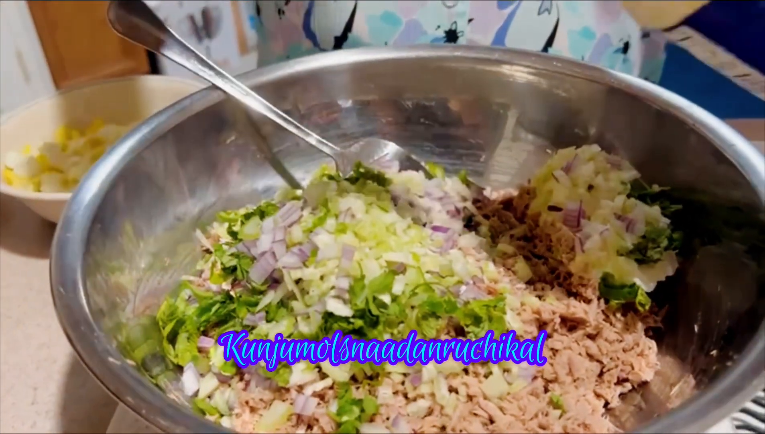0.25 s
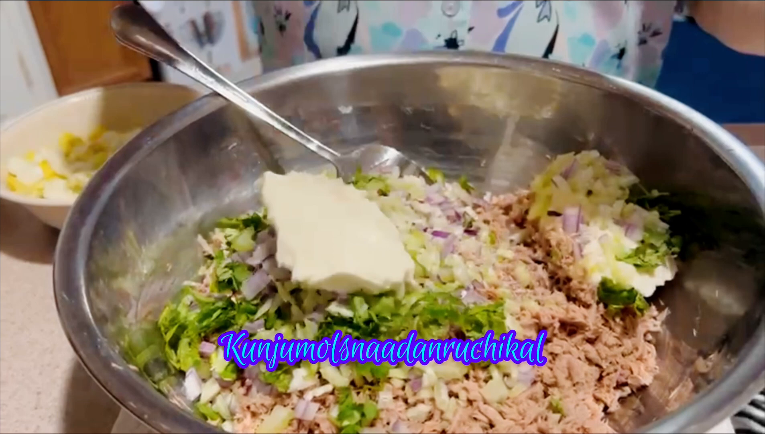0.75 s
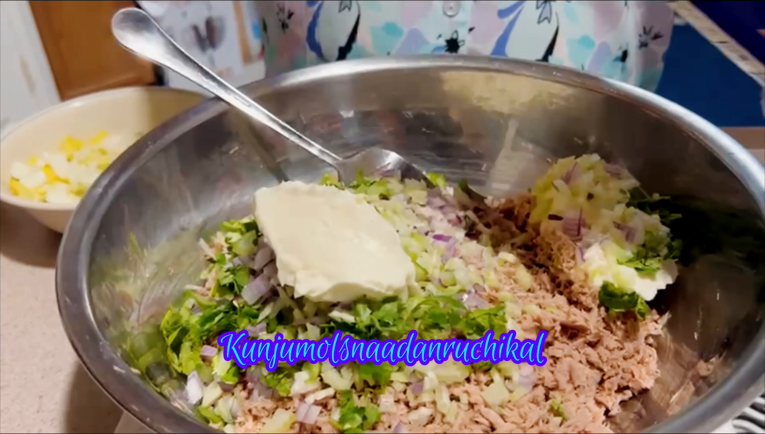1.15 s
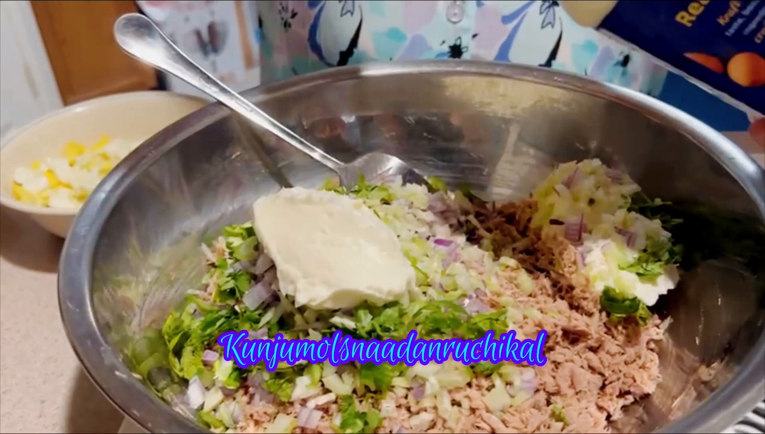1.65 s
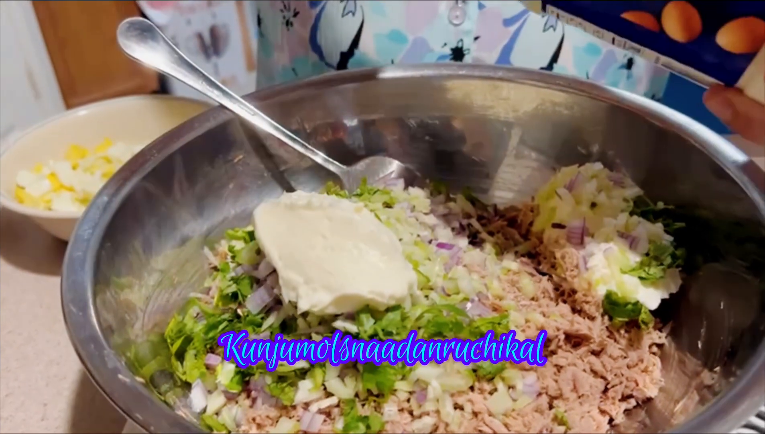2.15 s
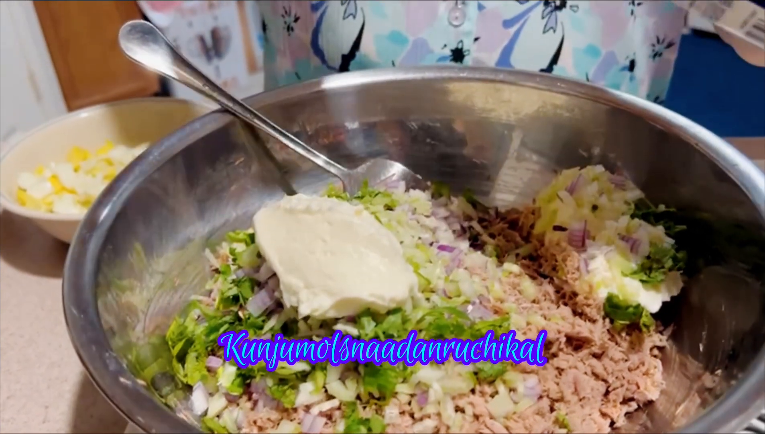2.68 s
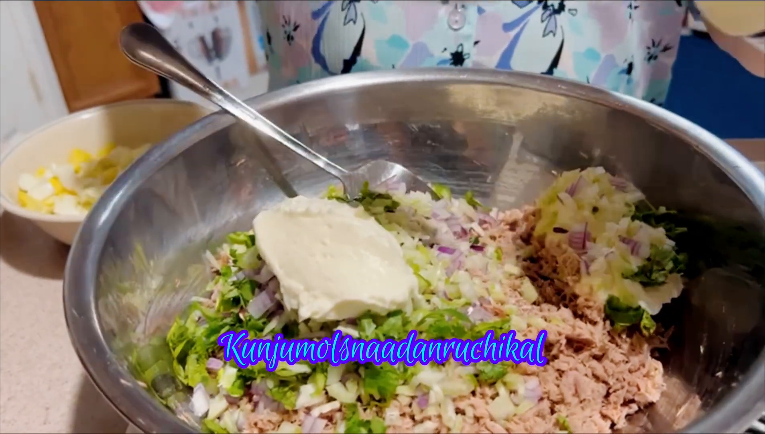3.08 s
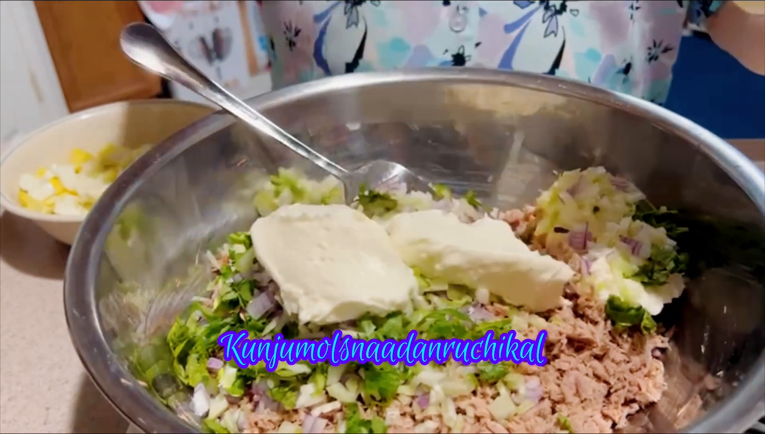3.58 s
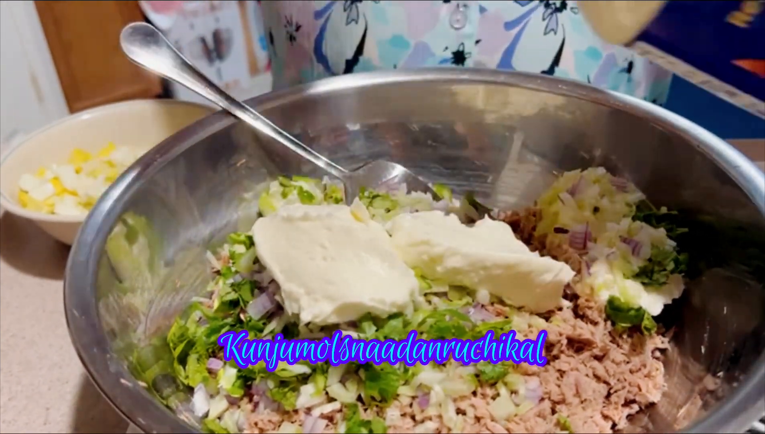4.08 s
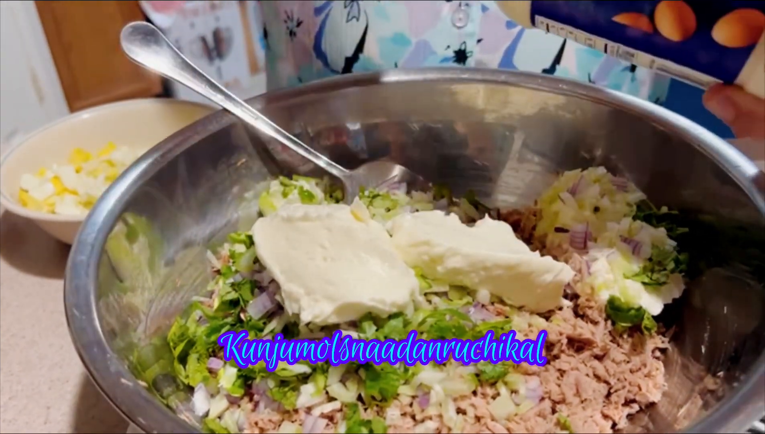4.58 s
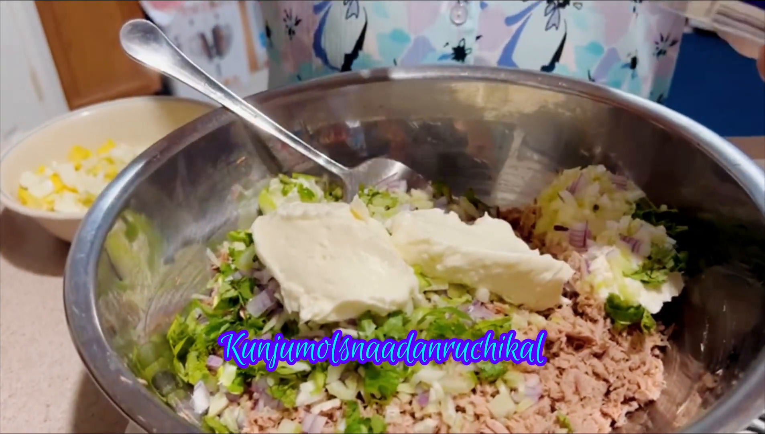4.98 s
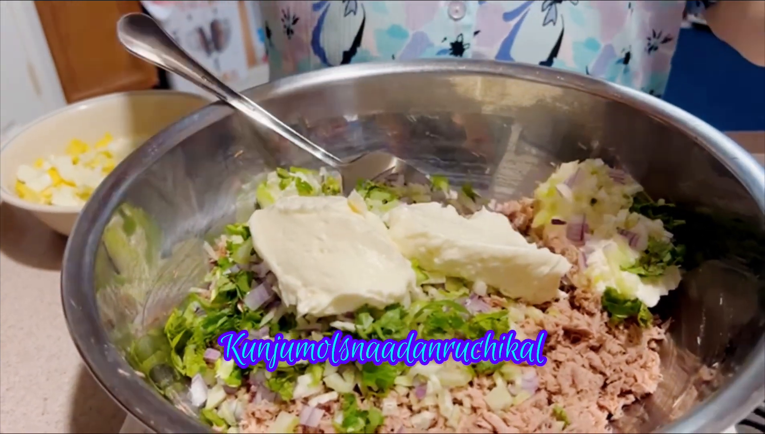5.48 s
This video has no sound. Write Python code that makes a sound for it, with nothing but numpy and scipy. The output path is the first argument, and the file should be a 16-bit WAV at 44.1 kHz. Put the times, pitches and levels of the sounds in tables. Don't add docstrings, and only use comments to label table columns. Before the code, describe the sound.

Quiet kitchen with a low refrigerator hum and rumble. A faint steel touch and a few tiny wet ticks, then two hard hollow plastic knocks just after one second, lighter knocks and a soft sticky scrape near two. After a pause come small ticks, a knock around four, then a busy scraping flurry and a deeper late knock. Close phone stereo; the jar sits to the right.

```python
import sys
import numpy as np
from scipy import signal
from scipy.fft import rfft, irfft, next_fast_len
from scipy.io import wavfile
from scipy.ndimage import uniform_filter1d, map_coordinates

SR = 44100
rng = np.random.default_rng(int(sys.argv[2]) if len(sys.argv) > 2 else 0)


def transcribe(u):
    v = np.clip(np.atleast_2d(u).T, -1, 1)
    q = np.round(v * 32767).astype(np.int16)
    wavfile.write(sys.argv[1], SR, q)


def invert_db(x):
    u = np.asarray(x, float) / 20
    return 10 ** u


N = 253114

# (time [s], crack level [dB], bright level [dB], air space [Hz], air ring level [dB])
KNOCKS = [(1.2268, -23, 4, 562, -31), (1.354, -27.5, 5.5, 571, -44.5), (1.5094, -68, -22, 574, -60),
          (1.8716, -34.5, 7, 607, -51.5), (2.1081, -54, 7, 575, -67), (2.1462, -50, -4, 568, -71),
          (2.2436, -41, -5.5, 540, -61), (2.308, -53, -26.5, 547, -64), (4.058, -37, -5, 526, -47.5),
          (4.6055, -56.5, -10, 494, -55.5), (4.6326, -50, -2, 530, -66), (4.6703, -45.5, -18, 677, -58),
          (4.704, -41.5, -17, 540, -53.5), (5.1044, -31.5, 3.5, 286, -46), (5.2906, -38, 7, 425.5, -54)]
# (time [s], thud level [dB], thud pitch [Hz], wall ring level [dB], wall ring pitch [Hz])
BODY = [(1.2268, -44.5, 289.5, -21, 1100), (1.23, -55, 380, -42, 1400), (1.354, -36, 398.3, -35, 1020),
        (1.87, -44.5, 330, -49, 870), (2.068, -46.5, 234.7, -69, 1046), (2.147, -43.5, 479, -54, 870),
        (2.243, -36.5, 437.5, -39, 900), (2.252, -43.5, 382.6, -47, 811), (4.058, -38, 342, -37.5, 1063),
        (4.606, -48, 242, -40.5, 1570), (4.629, -50, 321, -43.5, 1580), (4.671, -38, 374, -62.5, 854),
        (4.706, -39.5, 240, -45, 850), (4.766, -70, 243.8, -43, 1490), (5.105, -34.5, 327, -36.5, 1536),
        (5.292, -37, 408, -42, 965)]
# (time [s], t60 [s])
GRIP = [(1.23, 0.039), (1.51, 0.067), (1.87, 0.041), (2.3, 0.064), (4.06, 0.017), (4.7, 0.028),
        (5.3, 0.053)]
# (centre [Hz], width [Hz], level [dB])
JAR_WALL = [(720, 250, -2), (1090, 190, -6.5), (1360, 160, 0.5), (2100, 510, -4.5), (3240, 2000, -11.5)]
# (time [s], level [dB], centre [Hz])
THUMPS = [
    (1.229, -31, 758),
    (1.3542, -41.5, 800),
    (4.059, -40.5, 1350),
    (4.608, -47, 600),
    (4.673, -40.5, 630),
    (4.708, -52, 650),
    (5.106, -42, 290),
    (5.525, -50.5, 600),
]
# (time [s], level [dB], pitch [Hz])
COUNTER = [
    (1.227, -37.5, 105),
    (1.357, -53.5, 110),
    (5.106, -62, 122),
]
# (time [s], pitch [Hz], level [dB])
TILT = [
    (4.7, 560.5, -83),
    (4.762, 530.6, -71),
    (4.88, 482.7, -55),
    (4.98, 438, -58),
    (5.08, 386, -69),
]
# (start [s], lift [s], full level [dB])
DRAGS = [
    (2.08, 2.338, -70),
    (4.733, 5.11, -62),
]
# (centre [Hz], width [Hz], level [dB])
DRAGGED_JAR = [(479, 91, 2), (940, 42, -3.5), (1370, 47, 2), (2000, 420, -16.5), (2400, 250, -16),
               (3260, 190, -15), (3920, 470, -27), (4360, 190, -22), (5700, 780, -32)]
# (time [s], level [dB], centre [Hz])
STICK_SLIPS = [(2.109, -56, 600), (2.148, -46, 580), (2.16, -54, 900), (2.206, -60.5, 690), (2.247, -42.5, 560),
               (2.254, -47, 603), (2.265, -58, 800), (2.313, -56, 557),
               (4.82, -58, 493), (4.904, -48.5, 477), (4.917, -51, 525), (5.008, -59, 526), (5.031, -50.5, 1370),
         (5.05, -58.5, 930), (5.07, -57, 1380)]
# (time [s], level [dB], centre [Hz])
TAPS = [(.4535, -54, 2400), (.4555, -52.5, 1000), (.6065, -57, 1480), (1.4321, -53, 2000),
        (1.5912, -54, 2080), (1.6815, -77, 1030), (2.0181, -57, 1330), (2.0706, -39.5, 1090),
        (2.0854, -51, 1370), (2.1214, -49, 1410), (2.16, -69, 1500), (2.172, -60, 1290),
        (2.2337, -51, 1010), (2.2605, -60, 1370), (2.3736, -68, 1030), (2.4886, -62, 1490),
        (2.534, -65.5, 1820), (3.2528, -45.5, 1440), (3.285, -59.5, 1280), (3.383, -53, 1360),
        (3.6805, -52, 1510), (3.6893, -51, 1360), (4.373, -55, 1650), (4.4099, -68, 1620),
        (4.464, -56.5, 1340), (4.6221, -46, 1460), (4.6932, -48, 905), (4.7651, -45, 1360),
        (4.8464, -57, 1380), (4.961, -78, 990)]
# (time [s], level [dB], centre [Hz])
SNAPS = [(0.244, -82, 4700), (0.472, -56, 5700), (0.6068, -63, 7800), (1.43, -51.5, 7100),
         (1.5917, -60.5, 4530), (1.681, -59, 6900), (2.018, -52, 9200), (2.0702, -46.5, 7900),
         (2.122, -57, 9000), (2.159, -50, 8100), (2.172, -63, 7540), (2.194, -65, 5270), (2.26, -61, 8200),
         (2.375, -56.5, 5570), (2.437, -69, 7960), (3.252, -49.5, 9550), (3.285, -73, 8100),
         (5.5235, -72.5, 6450), (3.3832, -66.5, 5970), (3.68, -61.5, 6500), (4.311, -67, 7750),
         (4.357, -63.5, 9040), (4.3715, -57.5, 10000), (4.395, -67, 9300), (4.429, -67, 7600),
         (4.466, -49, 7800), (4.846, -64, 5680), (4.87, -56, 7140), (4.961, -68, 6640), (5.204, -61, 4430)]
# (time [s], level [dB],
# centre [Hz])
CRACKLES = [(.2432, -69, 8100), (0.4537, -51, 3400), (.459, -55, 2600), (.588, -60, 2000),
            (.597, -68, 7500), (1.395, -53, 8000), (1.465, -68, 6000), (1.477, -63, 5000),
            (1.487, -56, 2290), (1.5735, -71, 8000), (1.639, -59.5, 2400), (1.651, -60, 3700),
            (1.683, -71, 2620), (2.0715, -40.5, 4730), (2.086, -52, 5300), (2.1015, -55, 1900),
            (2.1067, -50, 8300), (2.142, -57, 8000), (2.21, -62, 2800), (2.2295, -70, 7600),
            (2.2437, -49.5, 7700), (2.3177, -54, 2500), (2.339, -63, 2400), (2.538, -71.5, 8000),
            (3.27, -72, 8500), (3.315, -68, 7500), (3.3843, -60, 2900), (3.6895, -60, 8500),
            (4.411, -55.5, 1850), (4.46, -64, 8200), (4.606, -52, 8500), (4.6714, -48, 8350),
            (4.695, -57, 8300), (4.7945, -63, 2200), (4.809, -64, 3300), (4.885, -56, 1900),
            (4.949, -67, 2300), (5.0045, -65, 6500), (5.049, -68, 2100), (5.062, -55, 1700),
            (5.165, -72, 7500), (5.24, -58, 5500), (5.251, -63, 1700), (5.259, -70, 6700),
            (5.336, -62, 5500), (5.345, -62, 4500), (5.524, -70.5, 7500), (1.2267, -24, 3300),
            (1.2265, -26, 6200), (2.0635, -64, 2500), (2.0665, -55, 8300), (2.112, -62, 4500),
            (2.12, -62, 3500), (2.127, -64, 5500), (2.173, -62, 5500), (4.0565, -49, 5000),
            (4.768, -48, 1500), (2.375, -65, 4500), (1.5915, -54, 2300)]
# (time [s], level [dB], centre [Hz], t60 [s])
LINGERS = [(1.238, -53, 2160, .2), (1.24, -50, 1090, .2), (1.24, -63, 2830, .25), (1.24, -62, 4400, .25),
           (1.365, -58, 2000, 0.49), (1.365, -66, 2650, .3), (1.46, -67, 6100, .15),
           (1.635, -68.5, 3900, 0.12), (2.255, -71, 2400, .15), (3.552, -69, 8400, 0.12),
           (3.552, -71, 6300, .15), (4.065, -62.5, 2450, 0.14), (4.64, -61, 1400, 0.076),
           (5.217, -65, 6500, .1), (5.111, -45.5, 257, 0.22), (5.04, -78, 4200, 0.35), (4.8, -77, 3300, .3),
           (5.4, -83.5, 2500, 0.46), (1.356, -52, 610, 0.12), (1.4, -52, 720, 0.099),
           (1.5, -58, 1900, 0.07), (4.064, -74, 8240, 0.073)]
# (middle [s], length [s], rms level [dB], centre
# [Hz])
SMEARS = [(0.465, 0.03, -62.5, 2470), (0.485, 0.026, -67, 4600), (0.608, 0.038, -74, 4300),
          (1.476, 0.13, -73.5, 3750), (1.645, 0.028, -67.5, 3370), (1.964, 0.039, -68, 5850),
          (2.32, 0.013, -69.5, 7600), (3.272, 0.066, -76.5, 7100), (3.424, 0.05, -81, 5900),
          (3.563, 0.023, -71, 7040), (3.688, 0.015, -70, 5630), (4.071, 0.026, -80.5, 2575),
          (4.47, 0.044, -76, 8160), (4.885, 0.032, -71, 7460), (5.343, 0.013, -64.5, 3720),
          (1.297, 0.064, -68, 4500), (5.162, .04, -72.5, 5940), (5.244, 0.03, -73.5, 5940)]
# (middle [s], length [s], rms level [dB], centre [Hz])
SHOVES = [(2.12, 0.049, -63.5, 880), (2.16, 0.0047, -54, 1080), (2.315, 0.038, -63, 694),
          (5.245, 0.021, -54.5, 1383), (5.533, 0.013, -59.5, 549), (3.41, 0.083, -72, 1240),
          (5.14, 0.11, -64.5, 930)]
# (middle [s], length [s], rms level [dB], centre [Hz])
FLEXES = [(1.235, 0.012, -45, 1280), (1.233, 0.01, -36, 730), (1.236, 0.014, -41.5, 158),
          (1.511, 0.02, -55, 353), (1.873, 0.0047, -50.5, 2050), (2.162, 0.006, -74, 1160),
          (2.173, 0.0056, -54, 1470), (4.072, .025, -63.5, 2400), (5.114, 0.015, -42, 295),
          (2.288, 0.055, -69, 1340), (2.488, 0.0091, -63, 1660), (2.536, 0.009, -67.5, 1770),
          (2.146, 0.0054, -55, 1450), (4.062, 0.0083, -40, 401), (5.052, 0.018, -58, 930),
          (5.572, 0.027, -66.5, 297)]
# (time [s], level [dB])
CHINKS = [(1.227, -44.5), (1.354, -47.5), (1.4301, -78), (1.8723, -53), (2.0173, -77), (2.071, -61),
          (2.3243, -62), (3.2525, -70), (4.3711, -61.5), (4.3926, -68), (4.6049, -61.5), (4.6309, -80),
          (4.6713, -66), (4.7044, -82), (5.1053, -60), (5.2903, -79)]
# (time [s], level [dB])
CLINK = (0.077, -58.5)
# (pitch [Hz], level [dB], t60 [s])
STEEL = [(2050, -10, 0.13), (2490, -18, 0.12), (5750, -13, 0.06), (3150, 0, 0.11), (3900, -1, 0.032),
         (7100, -14, 0.053), (6450, -16, 0.05), (8100, -15, 0.067)]
# (time [s], rustle level [dB])
HANDS = [(0., -70.5), (.3, -94), (.7, -94), (1.15, -74.5), (1.66, -66), (1.85, -87), (2.24, -64),
         (2.51, -76), (2.62, -91.5), (3.22, -94), (3.43, -69.5), (3.92, -89), (4.58, -75.5), (4.63, -60),
         (4.8, -82), (5.11, -67), (5.34, -62.5), (5.37, -71), (5.51, -93.5)]
# (frequency [Hz], level [dB])
RUSTLE = [(200, -20.5), (500, 4), (1200, -4), (2500, -5), (2850, -15), (6000, -31), (12000, -44)]
# (start [s], peak level [dB], t60 [s])
FIZZES = [(0., -87, 0.78), (1.26, -83.5, 0.9), (1.44, -84, 0.96), (1.88, -75.5, 0.93), (2.06, -65, 0.52),
          (2.26, -87, 1.9), (3.281, -93.5, 1), (4.3, -89, 2.8), (4.64, -81.5, 0.96), (5.17, -74, 0.21),
          (5.481, -98, 0.71)]
# (frequency [Hz], level [dB])
FIZZ_COLOUR = [(2000, -25), (4500, 1.5), (6500, 9), (9000, 2), (12000, -1.5)]
# (frequency [Hz], lag [rad])
LAG = [(200, .1), (340, .7), (600, .45), (800, .6), (1200, 1.4), (1900, 1.8), (3600, .4), (8000, .7),
       (9200, .3), (11400, 2.2), (11800, .5)]
# (frequency [Hz], level [dB])
SHADOW = [(300, -0.2), (700, -1.5), (1100, -5), (1800, -4), (3000, -12), (6500, -5), (7600, -1.5),
          (8800, -2.5)]
# (frequency [Hz], t60 [s])
KITCHEN = [(300, 0.53), (1500, 0.38), (5000, 0.32), (11000, 0.26)]
# (pitch [Hz], level [dB], width [Hz], steady share [0-1])
HUM = [(117.4, -52.5, 14, .74), (201.3, -57, 18, .33), (234, -68, 8, .3), (312, -75, 12, .3),
       (528, -77, 6, .6)]
# (frequency [Hz], level [dB per Hz])
FLOOR = [(15, -43.5), (33, -10.5), (42, -0.5), (52, 2), (85, -1), (105, -9.5), (150, -1), (210, -7.5),
         (270, -14), (550, -21), (1150, -31), (2500, -44), (3300, -50.5), (7200, -56.5), (12000, -59.5)]
# (frequency [Hz], likeness [0-1])
ALIKE = [(40, 0.74), (120, 0.91), (200, 1), (350, 0.83), (630, 0.38), (1200, 0.081), (3000, 0.56),
         (12000, 0.28)]
# (middle [s], length [s], rms level [dB], centre [Hz])
STREET = [
    (1.1, 0.6, -74.5, 1830),
    (3.545, 0.26, -76, 1900),
    (4.198, .4, -83, 2007),
    (5.6, 0.45, -87, 1800),
]
# (frequency [Hz], level [dB])
MIC = [(9000, 0), (10300, -3), (11500, 5.5), (12000, -15), (12600, -41)]
# (frequency [Hz], level [dB])
SHARED = [(9500, 0.5), (9750, -4), (10900, -11), (11250, -2.5)]
# (frequency [Hz], level [dB])
APART = [(1500, -0.5), (3000, -1), (7800, 3), (8500, 1.5), (8750, -8), (9300, -9), (9600, 3.5),
         (10600, 6.5), (11200, -0.5), (11600, -9.5)]


def unit(x):
    return x / np.sqrt(np.mean(x ** 2) + 1e-20)


def peak(x):
    return x / np.abs(x).max()


def along(points, hz):
    f, v = np.transpose(points)
    return np.interp(np.log(hz + 1), np.log(f + 1), v)


def filtered(x, response):
    n = x.shape[-1]
    m = next_fast_len(n + 4096)
    return irfft(rfft(x, m) * response(np.fft.rfftfreq(m, 1 / SR)), m)[..., :n]


def resonances(peaks):
    def response(f):
        total = 0
        for k, (centre, width, db) in enumerate(peaks):
            damping = 1j * f * width
            total = total + (-1) ** k * invert_db(db) * damping / (centre ** 2 - f ** 2 + damping)
        return total
    return response


def band(x, hz, width):
    one = resonances([(hz, width, 0)])
    return filtered(x, lambda f: one(f) ** 2)


def wobble(rate):
    knots = rng.standard_normal(int(N * rate / SR) + 4)
    return map_coordinates(knots, [np.arange(N) * rate / SR])


def grains(fast_db, slow_db):
    lumps = invert_db(fast_db * wobble(400) + slow_db * wobble(60))
    return lumps * rng.standard_normal(N)


def patches(shape, frames):
    field = uniform_filter1d(rng.standard_normal(shape), size=3, axis=0)
    return unit(uniform_filter1d(field, size=frames, axis=1))


def burst(t, t60, rise, contact):
    noise = rng.standard_normal(len(t)) * invert_db(-60 * t / t60) * (1 - np.exp(-t / rise))
    return noise - contact * (np.arange(len(t)) == 8)


def add(track, s, sound):
    track[round(s * SR):][:len(sound)] += sound


def knocks():
    out, t = np.zeros((2, N + SR)), np.arange(SR // 4) / SR
    jar, click = resonances(JAR_WALL), resonances([(5600, 5900, 1.7)])
    for s, db, bright_db, air_hz, air_db in KNOCKS:
        t60 = np.interp(s, *np.transpose(GRIP))
        blow = np.array([burst(t, 0.026, 0.00044, contact=1.5), 6.2 * (t == 0)])
        wall = filtered(blow, lambda f: jar(f) / (1 + 1j * f / 8000) ** 2)
        sharp = np.array([burst(t, 0.011, 0.0002, contact=7), 2.8 * (t == 0)])
        bright = filtered(sharp, lambda f: click(f) ** 2 / (1 + 1j * f / 9000) ** 3)
        crack = wall / np.abs(wall[0]).max() + invert_db(bright_db - 0.5) * bright / np.abs(bright[0]).max()

        waver = map_coordinates(rng.standard_normal(20), [2 + 55 * t])
        held = invert_db(-60 * (t / t60) ** 2.5)
        after_ring = invert_db(-27.5 - 60 * t / 0.25) * waver
        swell = (1 - np.exp(-t / 0.005)) * (held + after_ring)
        air = peak(swell * np.sin(2 * np.pi * air_hz * t + 0.5 * waver))
        air = air * invert_db([[0], [-9]])
        add(out.T, s, (invert_db(db + 2.5) * crack + invert_db(air_db + 10) * air).T)
    return out[:, :N]


def body():
    out, t = np.zeros(N + SR), np.arange(SR // 8) / SR
    for s, thud_db, thud_hz, ring_db, ring_hz in BODY:
        t60 = min(0.93 * np.interp(s, *np.transpose(GRIP)), 0.03)
        thud = peak(invert_db(-60 * t / 0.026) * np.sin(2 * np.pi * thud_hz * t))
        ring_level = invert_db(-60 * t / t60) * (1 - np.exp(-t / 0.00047))
        ring = peak(ring_level * np.sin(2 * np.pi * ring_hz * t))
        add(out, s, invert_db(thud_db - 0.5) * thud + invert_db(ring_db - 1) * ring)
    return out[:N]


def counter():
    out, t = np.zeros(N + SR), np.arange(SR // 4) / SR
    for s, db, hz in COUNTER:
        add(out, s, invert_db(db - 60 * t / 0.16) * np.sin(2 * np.pi * hz * t))
    return out[:N]


def tilt():
    s, hz, db = np.transpose(TILT)
    t = np.arange(N) / SR
    turns = np.cumsum(np.interp(t, s, hz)) / SR
    level = invert_db(np.interp(t, s, db, left=-130, right=-130))
    return level * unit(0.92 + wobble(70)) * np.sin(2 * np.pi * turns)


def drag():
    t = np.arange(N) / SR
    level = 0
    for s, lift, db in DRAGS:
        times = [s, s + 0.59 * (lift - s), lift, lift + 0.054]
        level = level + invert_db(db + np.interp(t, times, [-3, 0, 0, -17], left=-99, right=-99))
    rubbing = grains(fast_db=1.5, slow_db=-1.5)
    slips_per_s = 220
    slips = (rng.random(N) < slips_per_s / SR) * invert_db(4 * rng.standard_normal(N))
    return level * unit(filtered(unit(rubbing) + 1.3 * unit(slips), resonances(DRAGGED_JAR)))


def catches():
    out, t = np.zeros(N + SR), np.arange(SR // 16) / SR
    for s, db, hz in STICK_SLIPS:
        pulse = burst(t, 0.026, 0.001, contact=0.31)
        add(out, s, invert_db(db) * peak(band(pulse, hz, 0.47 * hz)))
    for s, db, hz in THUMPS:
        pulse = burst(t, 0.027, 0.00063, contact=0.72)
        add(out, s, invert_db(db) * peak(band(pulse, hz, 0.97 * hz)))
    return out[:N]


def ticks():
    out, t = np.zeros(N + SR), np.arange(SR // 16) / SR
    for s, db, hz in TAPS:
        tap = burst(t, 0.019, 0.00068, contact=0.23)
        add(out, s, invert_db(db) * peak(band(tap, hz, 1.35 * hz)))
    for s, db, hz in SNAPS:
        snap = burst(t, 0.02, 0.000079, contact=0.51)
        add(out, s, invert_db(db + 3) * peak(band(snap, hz, 0.44 * hz)))
    return out[:N]


def crackles():
    out, t = np.zeros(N + SR), np.arange(SR // 6) / SR
    for s, db, hz in CRACKLES:
        tear = burst(t[:1024], 0.013, 0.00014, contact=1.3)
        add(out, s, invert_db(db) * peak(band(tear, hz, 0.5 * hz)))
    for s, db, hz, t60 in LINGERS:
        fade = invert_db(-60 * t / t60) * (1 - np.exp(-t / 0.004)) * np.cos(np.pi / 2 * t / t[-1])
        mode = unit(band(rng.standard_normal(len(t)), hz, 0.06 * hz))
        add(out, s, invert_db(db) * fade * mode)
    return out[:N]


def smears():
    out, t = np.zeros(N + SR), np.arange(-SR // 10, SR // 10) / SR
    rows = [(*row, 0.94 * row[-1]) for row in SMEARS]
    rows += [(*row, 0.76 * row[-1]) for row in SHOVES]
    rows += [(*row, 210) for row in FLEXES]
    for s, length, db, hz, width in rows:
        lumps = invert_db(3.5 * np.repeat(rng.standard_normal(len(t)), 60)[:len(t)])
        grain = lumps * rng.standard_normal(len(t))
        swell = np.exp(-(2 * t / length) ** 2)
        smear = unit(band(grain, hz, width) * swell) * np.sqrt(np.mean(swell ** 2))
        add(out, s + t[0], invert_db(db) * smear)
    return out[:N]


def chinks():
    out, t = np.zeros(N + SR), np.arange(SR // 16) / SR
    for s, db in CHINKS:
        strike = burst(t, 0.028, 0.00027, contact=3)
        add(out, s, invert_db(db - 3) * peak(band(strike, hz=11750, width=500)))
    return out[:N]


def clink():
    out, t = np.zeros(N), np.arange(SR // 4) / SR
    ring = sum(invert_db(db - 60 * t / t60) * np.sin(2 * np.pi * hz * t) for hz, db, t60 in STEEL)
    s, level_db = CLINK
    add(out, s, invert_db(level_db) * ring * (1 - np.exp(-t / 0.0058)))
    return out


def rub():
    t = np.arange(N) / SR
    fizz_level = invert_db(-93.5)
    for s, db, t60 in FIZZES:
        age = np.maximum(t - s, 0)
        fizz_level = fizz_level + invert_db(db - 60 * age / t60) * np.minimum(age / 0.025, 1)
    rustle = unit(filtered(grains(fast_db=3, slow_db=5.5), lambda f: invert_db(along(RUSTLE, f))))
    fizz = unit(filtered(grains(fast_db=2.5, slow_db=1.5), lambda f: invert_db(along(FIZZ_COLOUR, f))))
    return invert_db(np.interp(t, *np.transpose(HANDS))) * rustle + fizz_level * fizz


def kitchen(x):
    out, step = np.zeros((2, N + SR)), SR // 3
    for start in range(0, N, step):
        hz, t, z = signal.stft(rng.standard_normal((2, SR // 2)), SR, nperseg=256)
        decay_db = 60 * t / along(KITCHEN, hz)[:, None]
        uneven_db = 3 * patches(z.shape[1:], frames=12)
        tail = signal.istft(z * invert_db(uneven_db - decay_db), SR, nperseg=256)[1]
        tail = tail * (1 - np.exp(-np.arange(tail.shape[1]) / SR / 0.0012))
        wet = signal.fftconvolve(x[None, start:start + step], tail / np.linalg.norm(tail[0]), axes=1)
        out[:, start:start + wet.shape[1]] += wet
    return out[:, :N]


def hum():
    t = np.arange(N) / SR
    tones = 0
    for hz, db, width, share in HUM:
        blur = unit(band(rng.standard_normal(N), hz, width))
        steady = np.sin(2 * np.pi * hz * t + 0.72 * wobble(2.998))
        tones = tones + invert_db(db) * (np.sqrt(2 * share) * steady + np.sqrt(1 - share) * blur)
    left = filtered(tones, lambda f: np.exp(-1j * 0.081 * (1 + (f / 260) ** 4)))
    return np.array([left, tones])


def patchy(depth_db):
    z = signal.stft(rng.standard_normal((2, N)), nperseg=512)[2]
    drift = invert_db(depth_db * patches(z.shape[1:], frames=14))
    return signal.istft(z * drift, nperseg=512)[1][:, :N]


def floor():
    def mid_and_side(f):
        turn = np.arccos(np.clip(along(ALIKE, f), -1, 1)) / 2
        return invert_db(along(FLOOR, f)) * np.array([np.cos(turn), np.sin(turn)])

    mid, side = filtered(patchy(depth_db=3.5), mid_and_side)
    return invert_db(-55) * unit(np.array([mid + side, mid - side]))


def street():
    t = np.arange(N) / SR
    swells = 0
    for s, length, db, hz in STREET:
        hiss = unit(band(rng.standard_normal((2, N)), hz, 0.7 * hz))
        swells = swells + invert_db(db) * np.exp(-(2 * (t - s) / length) ** 2) * hiss
    return filtered(swells, lambda f: 1 / (1 + (f / 2550) ** 20))


def scene():
    knock, spread = knocks()
    rings = body()
    small = ticks() + smears() + rub() + drag() + catches() + crackles()
    right = knock + rings + small + counter() + clink()
    left = filtered(right, lambda f: invert_db(along(SHADOW, f)) * np.exp(-1j * along(LAG, f)))
    jar = invert_db(1.5) * np.array([left, right])
    spoon = invert_db([[1.5], [3.5]]) * chinks()
    air = np.array([[0.3], [1.3]]) * tilt()
    room = invert_db(-9) * kitchen(spread + invert_db(-8) * rings + small)
    return jar + spoon + air + room + hum() + floor() + street()


def bass_dropouts(side):
    hz, t, z = signal.stft(side, SR, nperseg=2048)
    luck = uniform_filter1d(rng.random(len(t)), size=2).argsort().argsort() / len(t)
    low_hz, high_hz = 38, 400
    edge = low_hz * (high_hz / low_hz) ** np.cbrt(luck)
    power = np.sum(np.abs(z) ** 2, axis=0)
    edge = np.where(power > 100 * np.median(power), low_hz, edge)
    lift_db = 7 / (1 + (hz[:, None] / 250) ** 4)
    gain = (hz[:, None] > edge) * invert_db(lift_db)
    return signal.istft(z * gain, SR, nperseg=2048)[1][:N]


def low_pass(x):
    return signal.sosfilt(signal.butter(12, 12710, fs=SR, output="sos"), x)


def record(dry):
    left, right = filtered(dry, lambda f: invert_db(along(MIC, f)))
    mid = filtered((left + right) / 2, lambda f: invert_db(along(SHARED, f)))
    side = filtered((left - right) / 2, lambda f: invert_db(along(APART, f)))
    side = bass_dropouts(side)
    return low_pass(np.array([mid + side, mid - side]))


dry = scene()
out = record(dry)
transcribe(out)
```